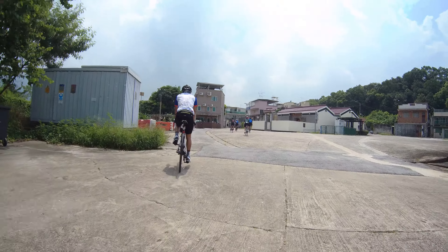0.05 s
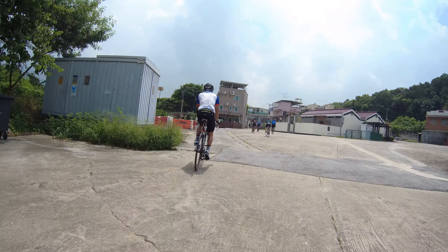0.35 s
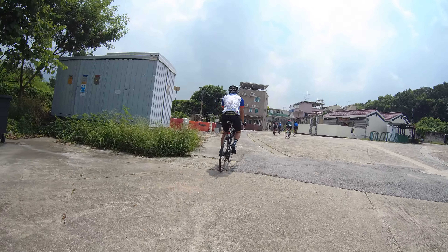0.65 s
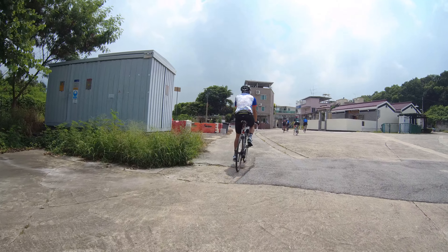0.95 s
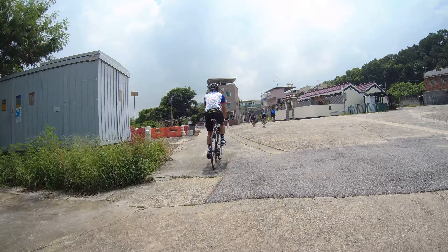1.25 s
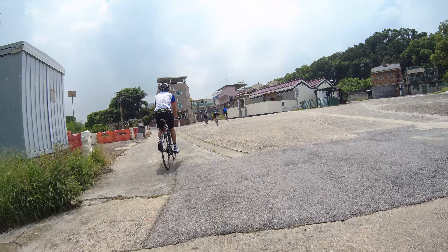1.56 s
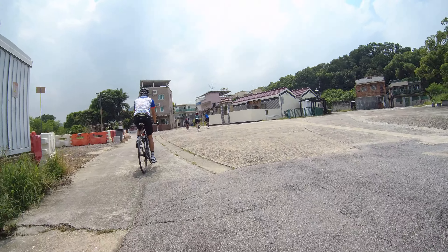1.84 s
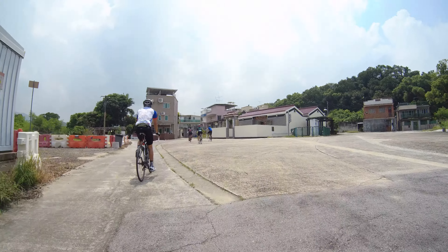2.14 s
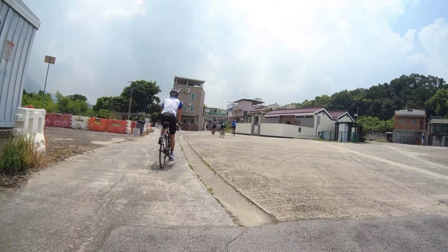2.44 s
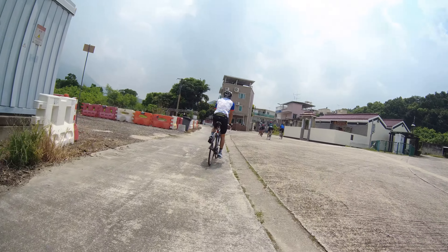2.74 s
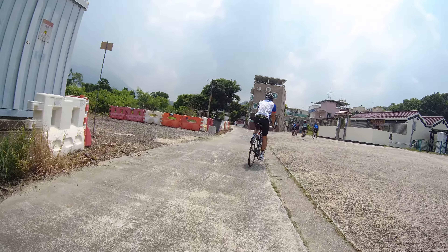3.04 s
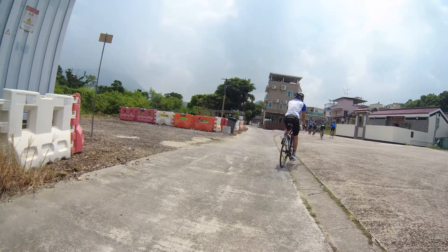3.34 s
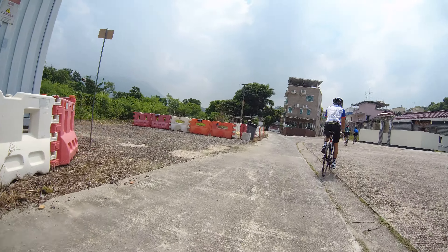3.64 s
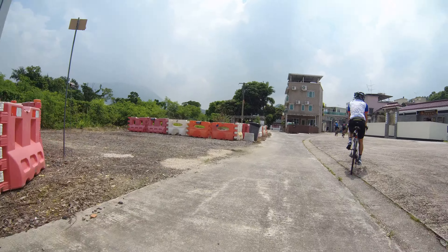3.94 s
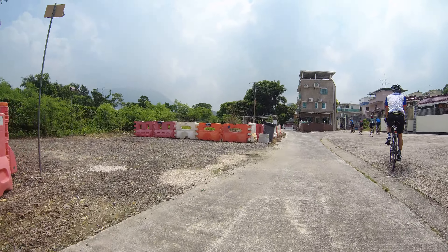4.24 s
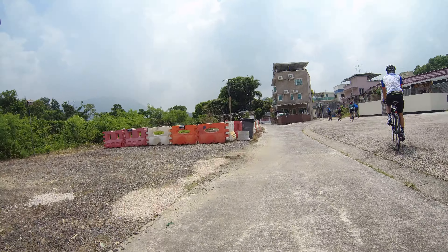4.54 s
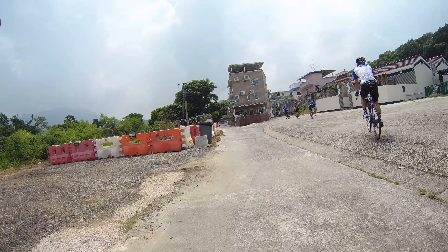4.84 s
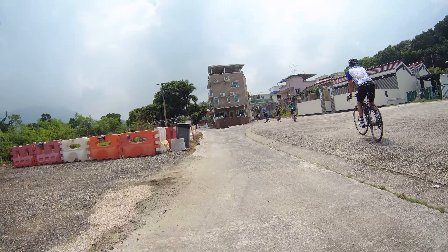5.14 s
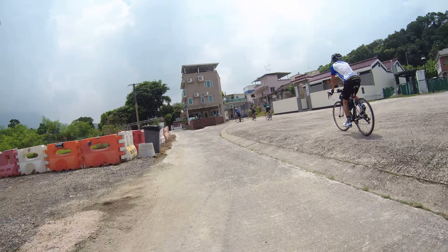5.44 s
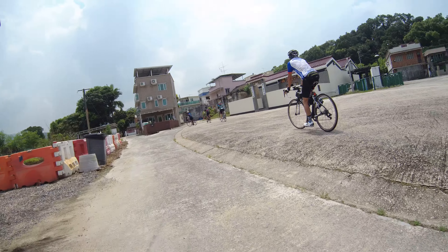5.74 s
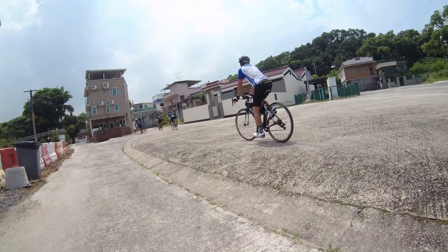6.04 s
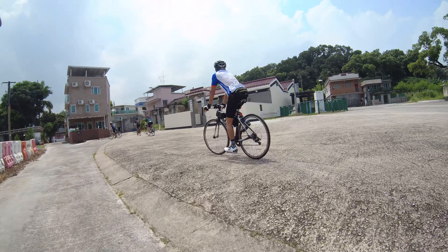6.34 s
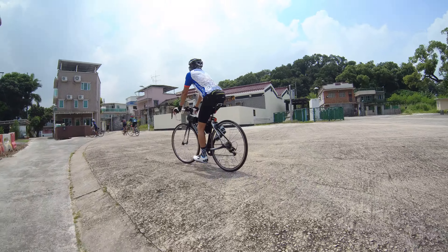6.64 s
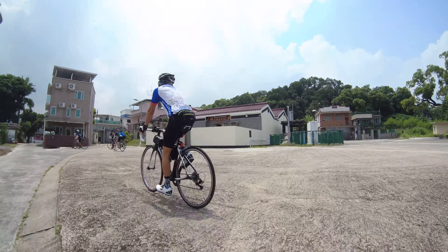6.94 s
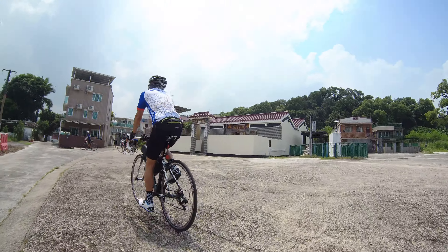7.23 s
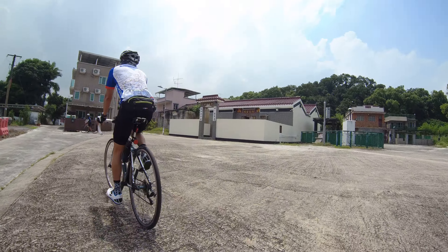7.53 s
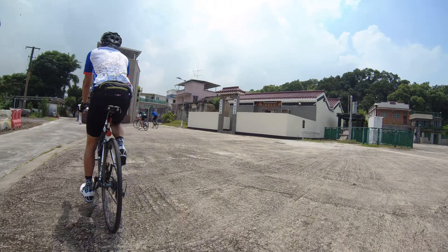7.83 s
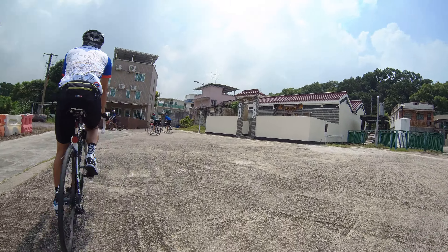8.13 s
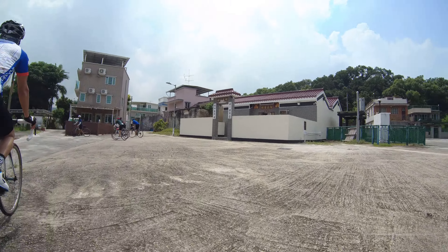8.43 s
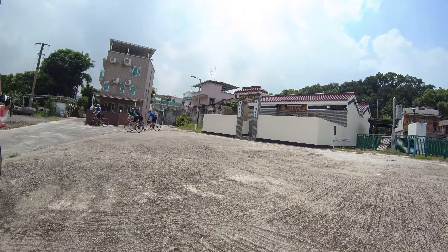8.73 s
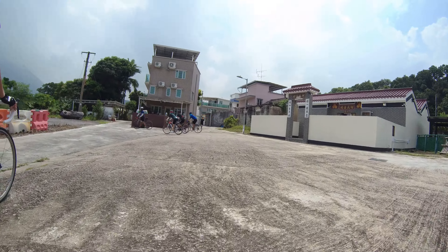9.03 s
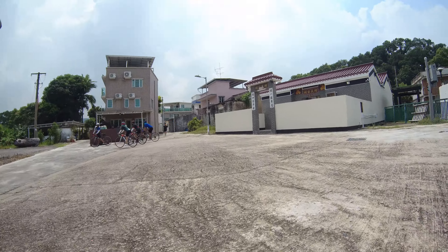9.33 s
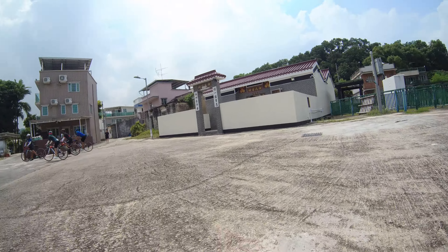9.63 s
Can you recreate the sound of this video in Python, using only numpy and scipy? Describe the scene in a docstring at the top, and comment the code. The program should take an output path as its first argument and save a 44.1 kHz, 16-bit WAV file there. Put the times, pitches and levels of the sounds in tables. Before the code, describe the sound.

A bicycle rolls over rough concrete, heard through a microphone mounted on it as a low, throbbing rumble with tyre noise and fine crackling grit. The freewheel ticks rapidly at the start, in the middle and near the end. One gear change clunks and rings briefly after the first coast. Sharp clicks, dull knocks and brief creaks come from the microphone's case and mount, growing busier in the later part.

```python
"""On a rough concrete road, a camera rides on a bicycle and hears mostly through the frame and its case.
The surface forces the frame and mount into a low rumble, while the tyres roar and grit crackles under them.
Whenever the rider coasts, the freewheel's pawls strike the ratchet and excite the modes of the hub.
Impacts set the case ringing in sharp clicks and dull knocks, the mount creaks by stick-slip friction,
and one gear change clunks and leaves the drivetrain ringing. A faint microphone hiss lies underneath."""
import sys
import numpy as np
from scipy import signal
from scipy.fft import rfft, irfft, next_fast_len
from scipy.io import wavfile

SR = 44100
rng = np.random.default_rng(int(sys.argv[2]) if len(sys.argv) > 2 else 0)


def store_wav(level_fs):
    """Save 16-bit WAV to argv[1]."""
    pcm = np.round(np.clip(np.atleast_2d(level_fs), -1, 1) * 32767)
    wavfile.write(sys.argv[1], SR, pcm.T.astype(np.int16))


N = 431298
TIME = np.arange(N) / SR

# course of the ride: t/s, rumble level/dB, tyre level/dB
RIDE_LEVELS = [(0.0, -44.5, -47), (0.11, -32, -48), (0.24, -32, -48.5), (0.68, -37.5, -55.5),
               (1.8, -34.5, -53), (1.93, -45.5, -60), (1.96, -39, -42), (2.12, -32.5, -46.5),
               (2.42, -34.5, -52), (3.18, -32, -51.5), (3.32, -31.5, -50.5), (7.14, -31.5, -46),
               (7.68, -33.5, -51.5), (8.58, -30, -43.5), (9.1, -34, -50), (9.42, -27.5, -39.5),
               (9.78, -30, -44)]
# modes of the frame and mount: f/Hz, bandwidth/Hz, level/dB
FRAME_MODES = [(32.2, 12, -3), (50.7, 6.2, 0), (77.1, 9.2, 2.5), (107, 98, 3), (166.3, 18, -1),
               (190.1, 9.7, -6), (264, 70, -20)]
# tyre roar on concrete: f/Hz, spectral level/dB
TYRE_SPECTRUM = [(150, -0.5), (260, -9), (400, -4.5), (580, -6.5), (780, -14.5), (1180, -7.5), (1600, -22),
                 (2200, -26), (3200, -42.5), (5000, -48)]
# sustained resonances of the mount: f/Hz, wander/Hz, level relative to the rumble/dB
MOUNT_TONES = [(78, 5, -9), (187, 8, -8.5)]
# grit as heard through the case: f/Hz, spectral level/dB
GRIT_SPECTRUM = [(500, 0), (1200, 12), (1600, 14), (2200, 1), (2750, -3), (3600, -13), (4500, -25),
                 (11000, -38)]
# coasting: start/s, end/s, full tooth rate/Hz, hub level/dB, tick level/dB, second pawl level/dB
COASTS = [(0, 1.87, 48, 2, 4.5, -18), (3.982, 6.5, 47, -1.5, 4, -8), (8.87, 11, 54, -1.5, 5, -9)]
# modes of hub and frame struck by the pawls: f/Hz, bandwidth/Hz, level/dB
HUB_MODES = [(956, 20, 4.5), (995, 21, 10.5), (1173, 65, 12), (1278, 61, 7.5), (1495, 72, 10.5),
             (1572, 85, 8), (1809, 44, 7)]
# thin tick of the pawls themselves: f/Hz, spectral level/dB
PAWL_SPECTRUM = [(2000, 9), (3500, 4), (3880, 11), (4200, 2), (4750, 6.5), (5400, -5), (6800, 5),
                 (8000, 0.5), (10000, 6.5), (11000, 1.5), (14000, 2), (16000, -25)]
# microphone hiss with a faint high whine: f/Hz, spectral level/dB
HISS_SPECTRUM = [(1000, -30), (4000, 3.5), (7000, 2), (12100, -1.5), (12330, 8.5), (12600, 8), (14000, -6),
                 (16000, -12)]
# modes of the case: f/Hz, bandwidth/Hz, level/dB
CASE_MODES = [(980, 380, -10), (1329, 467, 6.5), (1544, 100, -6.5), (2678, 340, 0), (3184, 230, -2),
              (3910, 316, 4.5), (4250, 490, -3), (4465, 670, -7.5), (6150, 270, -19.5), (6650, 580, -6),
              (8300, 660, -7.5), (9060, 320, -22), (10780, 4300, -18.5)]
# faint metallic after-ring of the case: f/Hz, bandwidth/Hz, level/dB
PING_MODES = [(6014, 55, -31)]
# antiresonances of the case wall: f/Hz, bandwidth/Hz
CASE_ANTIRESONANCES = [(3570, 240), (5230, 900), (7550, 500)]
# slips of the mount: t/s, level/dB, treble level/dB, duration/ms
CREAKS = [(0.085, -12.5, -50, 4.3), (3.565, -12, -21, 3.3), (3.585, -11, -6, 10.5),
          (3.6085, -8.5, -18, 5.4), (4.963, -38, -9, 16), (9.593, -18, -20, 4.7), (9.736, -17, -33, 0.58)]
# sharp rattles of the case in its mount: t/s, level/dB, midrange level/dB
RATTLES = [(0.0892, -15.5, -14), (0.1121, -22, -12), (0.138, -15.5, -14), (0.507, -9.5, -14),
           (0.5888, -19, -12), (2.0289, -11.5, -13), (2.1273, -6.5, -15.5), (2.4651, -9.5, -14.5),
           (3.1766, -5, -21.5), (3.2003, -8, -14), (3.22, -26, -16), (3.263, -21, -13), (3.5674, -10, -12),
           (6.5287, -5, -12.5), (6.7476, -9.5, -14), (6.9766, -6.5, -19), (7.0175, -13.5, -22),
           (7.0927, 2, -20), (7.1451, -17.5, -20), (7.162, -20.5, 1), (7.2195, -8, -20), (7.2616, -14, -22),
           (7.6198, -24, -19), (7.7119, -8, -2), (7.7717, -14, -16), (8.1286, -14, -17), (8.1728, -17, -20),
           (8.326, -12, -9.5), (8.3619, -12.5, -18), (8.4008, -14, -15), (8.4409, -14, -20),
           (8.52, -7.5, -19), (8.7945, -6.5, -24), (8.8652, -16, -15), (8.979, -15, -12), (9.296, 2.5, -16),
           (9.3759, -12.5, -13), (9.409, -14.5, -18), (9.528, -14, -25), (9.5677, -18, -17),
           (9.6387, -14.5, -21), (9.7488, -16.5, -10)]
# stones under the wheels: t/s, level/dB, midrange level/dB
STONES = [(0.2816, -25.5, -17), (0.7628, -34, -16), (1.439, -28.5, -13), (1.6056, -28.5, -20),
          (2.564, -30, -50), (3.0037, -37.5, -24), (3.395, -24.5, -13), (4.1081, -27, -8),
          (4.6523, -32.5, -8), (4.7973, -24, -10), (4.9004, -28, -21), (5.5957, -29.5, -23),
          (5.9499, -28, -14), (6.3585, -30, -14), (6.5917, -33, -45), (6.7549, -22.5, -28),
          (6.767, -26, -19), (6.930, -33, -19), (6.9926, -19, -11), (7.1028, -13, -20), (7.4912, -32, -13),
          (7.874, -25, -45)]
# blows of the chain dropping onto a sprocket: t/s, level/dB
CHAIN_BLOWS = [(1.9465, -13.5), (1.953, -2), (1.966, -12.5), (2.018, -16)]
# modes of the drivetrain: f/Hz, bandwidth/Hz, level/dB
DRIVETRAIN_MODES = [(371, 60, 1), (430, 120, 3), (507, 6, -2), (568, 1.7, -1.5), (582, 1.2, -1.5),
                    (724, 150, -0.5), (1152, 6, -4.5), (1314, 9.1, -14), (1425, 51, -4.5), (3700, 310, -31)]
# bumps that thump the frame: t/s, level/dB
BUMPS = [(3.676, -7.5), (6.756, -2), (9.145, -2.5)]
# patches of broken concrete: centre t/s, half duration/s, gain/dB
BROKEN_PATCHES = [(4.974, 0.05, 7.5), (6.145, 0.0064, 12), (6.609, 0.014, 10.5), (6.68, 0.038, 6)]


def undb(db):
    """Amplitude ratio of a level in decibels."""
    return 10 ** (np.asarray(db) / 20)


def unit(x):
    """Normalisation to an rms of 1."""
    return x / np.sqrt(np.mean(x ** 2))


def noise():
    """White Gaussian noise."""
    return rng.standard_normal(N)


def wander(rate_hz):
    """Random modulation of rms 1, linear between independent values."""
    knots = rng.standard_normal(2048)
    return unit(np.interp(TIME * rate_hz, np.arange(len(knots)), knots))


def colour(x, spectrum):
    """Spectral shaping by an envelope that falls 12 dB per octave beyond its ends; the rms is 1."""
    hz, db = np.transpose(spectrum)
    size = next_fast_len(N + 4096)
    f = np.maximum(np.arange(size // 2 + 1) * SR / size, 1)
    skirts = np.minimum(f / hz[0], 1) ** 2 * np.minimum(hz[-1] / f, 1) ** 2
    envelope = undb(np.interp(np.log(f), np.log(hz), db))
    return unit(irfft(rfft(x, size) * skirts * envelope, size)[:N])


def cut(x, order, hz, kind):
    """Maximally flat high-pass or low-pass filtering."""
    return signal.sosfilt(signal.butter(order, hz, kind, fs=SR, output="sos"), x)


def ring(modes, size, rise_ms, low_hz, travel_ms=0):
    """Impulse response as a sum of damped modes, weighted by energy; the bass radiates poorly."""
    hz, width, db = np.transpose(modes)[:, :, None]
    # bending waves: low modes arrive later and build up more slowly (both times given at 1 kHz)
    t = np.maximum(np.arange(size) / SR - travel_ms / hz, 0)
    waves = np.sin(2 * np.pi * hz * t) * np.exp(-np.pi * width * t) * (1 - np.exp(-t * hz / rise_ms))
    waves /= np.sqrt(np.sum(waves ** 2, axis=1, keepdims=True))
    return cut(np.sum(undb(db) * waves, axis=0), 2, low_hz, "high")


def place(events):
    """Superposition of transients, each given as t/s, level/dB, waveform."""
    out = np.zeros(N)
    for s, db, sound in events:
        i = int(s * SR)
        out[i:i + len(sound)] += undb(db) * sound[:max(N - i, 0)]
    return out


def road_rumble(rumble_db, roughness, swell_db=2.3):
    """Forced vibration: the rough surface drives the modes of the frame with a random force."""
    force = noise() * undb(rumble_db + swell_db * roughness)
    frame = ring(FRAME_MODES, size=16384, rise_ms=0.021, low_hz=24.7)
    shake = signal.fftconvolve(force, frame)[:N]
    return cut(shake, 6, 26, "high") * undb(-9.5)


def tyre_roar(tyre_db, roughness, swell_db=1.6, flicker_db=4):
    """Rolling noise: a broad band whose amplitude is modulated by the roughness of the road."""
    return colour(noise(), TYRE_SPECTRUM) * undb(tyre_db + swell_db * roughness + flicker_db * wander(170))


def mount_throb(rumble_db):
    """Resonance: the camera keeps swinging on its mount, pulsing and wandering in pitch."""
    out = np.zeros(N)
    for hz, wander_hz, db in MOUNT_TONES:
        pulse_db = 3 * wander(20)
        phase = 2 * np.pi * np.cumsum(hz + wander_hz * wander(20)) / SR
        out += np.sin(phase) * undb(rumble_db + db + pulse_db)
    return out


def grit(tyre_db, hits_per_s=130, spread_db=6):
    """Shot noise: small stones crack under the tyres at random and merge into a fine, dull crackle."""
    sizes = undb(spread_db * np.minimum(rng.exponential(size=N), 2.4))
    hits = (rng.random(N) < hits_per_s / SR) * sizes * np.sign(noise())
    return colour(hits, GRIT_SPECTRUM) * undb(tyre_db - 9.5)


def coasting_curves(stop_s=.25, restart_s=.22, hub_fade_db_per_s=0.34, tick_fade_db_per_s=1):
    """Relative motion: the tooth rate drops while the pedals turn; the levels fade through a coast."""
    rate, hub_db, tick_db, second_db = np.zeros((4, N))
    for start, end, full_rate, hub, tick, second in COASTS:
        now = TIME >= start
        since, left = TIME[now] - start, np.maximum(end - TIME[now], 0)
        pedal_share = .2 * np.exp(-since / stop_s) + .33 * np.exp(-left / restart_s)
        rate[now] = full_rate * (1 - pedal_share)
        hub_db[now] = hub - hub_fade_db_per_s * since
        tick_db[now] = tick - tick_fade_db_per_s * since
        second_db[now] = second
    return rate, hub_db, tick_db, second_db


def freewheel(wobble=.016, jitter_teeth=0.018, lag_teeth=0.3, tick_teeth=.14, scrape_db=-14):
    """Periodic impact: pawls drop off the ratchet teeth and ring the hub, a weaker one in between."""
    rate, hub_db, tick_db, second_db = coasting_curves()
    coasting = sum((TIME >= start) & (TIME < end) for start, end, *_ in COASTS)
    teeth = np.cumsum(rate * (1 + wobble * wander(7))) / SR + jitter_teeth * wander(40)
    surge_db = 1.93 * wander(6)  # the pawls bite unevenly as the wheel turns
    drops, ticks = np.zeros((2, N))
    for lag, db in ((0, 0), (lag_teeth, second_db)):
        phase = (teeth - lag) % 1
        strength = undb(db + surge_db + 3 * wander(58))
        drops += (np.diff(phase, prepend=0) < -.5) * strength
        ticks += strength * np.exp(-(np.minimum(phase, 1 - phase) / tick_teeth) ** 2)
    # each drop is a blow within a short scrape along the tooth
    force = (unit(drops) + undb(scrape_db) * unit(ticks * noise())) * coasting
    hub = np.zeros(N)
    for modes in (HUB_MODES[::2], HUB_MODES[1::2]):  # neighbouring modes swell and fade independently
        response = ring(modes, size=4096, rise_ms=0.73, low_hz=850)
        hub += signal.oaconvolve(force, response)[:N] * undb(2.5 * wander(7))
    hub = cut(hub, 8, 2000, "low")  # the frame passes little treble
    thin_tick = colour(noise(), PAWL_SPECTRUM) * ticks * coasting
    return unit(hub) * undb(hub_db - 51.5) + thin_tick * undb(tick_db - 66.5)


def microphone_hiss():
    """Self-noise: a steady microphone hiss, with a faint whine from the camera's electronics as one narrow
    spectral peak."""
    return colour(noise(), HISS_SPECTRUM) * undb(-78)


def case_knock(mid_db, treble_db, detune=.008, scatter_db=2.24, rebound_ms=.66, rebound=0.098):
    """Impact with a quick rebound: the harder the contact, the more it excites the upper case modes."""
    hz, width, db = np.transpose(CASE_MODES + PING_MODES)
    drift, scatter = rng.standard_normal((2, len(hz)))
    hz = hz * (1 + detune * drift)
    hardness_db = np.interp(hz, [1700, 3000, 6200], [0, mid_db, treble_db])
    modes = np.transpose([hz, width, db + hardness_db + scatter_db * scatter])
    blow = ring(modes, size=2048, rise_ms=0.65, low_hz=640, travel_ms=0.72)
    for dip_hz, dip_width in CASE_ANTIRESONANCES:
        blow = signal.lfilter(*signal.iirnotch(dip_hz, dip_hz / dip_width, fs=SR), blow)
    lag = int(rebound_ms * rng.uniform(.85, 1.1) * SR / 1000)
    return blow + rebound * np.pad(blow, (lag, 0))[:len(blow)]


def frame_thuds(blows):
    """Free vibration: each blow (t/s, level/dB) leaves the low modes of the frame to decay."""
    frame = ring(FRAME_MODES, size=16384, rise_ms=0.035, low_hz=132)
    return place((s, db, frame) for s, db, *_ in blows)


def jolt(events, thud_db=-16):
    """Mechanical coupling: each sound of the case, scaled by energy, comes with a thud in the frame."""
    case = place((s, db, sound / (np.linalg.norm(sound) + 1e-12)) for s, db, sound in events)
    return case + undb(thud_db) * frame_thuds(events)


def mount_creaks(slip_chance=0.12, lurch_db=-8):
    """Stick-slip friction: the mount gives way in a run of tiny blows, and the whole camera lurches."""
    events = []
    for s, db, treble_db, ms in CREAKS:
        slips = rng.standard_normal(2048) * (rng.random(2048) < slip_chance)
        creak = signal.fftconvolve(slips[:int(ms * SR / 1000)], case_knock(treble_db / 5, treble_db))
        events.append((s, db, creak))
    return (jolt(events) + undb(lurch_db) * frame_thuds(CREAKS)) * undb(15)


def case_rattles(heavy_db=-13, treble_loss_db_per_db=0.76):
    """Contact time limits bandwidth: light rattles snap, heavy ones press longer and sound duller."""
    events = []
    for s, db, mid_db in RATTLES:
        treble_db = 1 - treble_loss_db_per_db * max(db - heavy_db, 0)
        events.append((s, db, case_knock(mid_db + 11, treble_db)))
    return jolt(events) * undb(11)


def stone_knocks():
    """Structure-borne sound: stones under the wheels reach the case as knocks with little treble."""
    events = [(s, db, case_knock(mid_db + 9.5, treble_db=-56)) for s, db, mid_db in STONES]
    return jolt(events) * undb(12)


def gear_change(waver_s=.00018, waver_db=3.7, onset_s=.15):
    """Modal decay: the chain lands on a sprocket in a few blows, and lightly damped modes ring on."""
    clunk = ring(DRIVETRAIN_MODES, size=44100, rise_ms=0.49, low_hz=223)
    ringing = place((s, db, clunk) for s, db in CHAIN_BLOWS)
    ringing = np.interp(TIME + waver_s * wander(35), TIME, ringing)  # the pitch wavers
    depth = np.clip((TIME - CHAIN_BLOWS[0][0]) / onset_s, 0, 1)
    return ringing * undb(waver_db * depth * wander(45))


def broken_concrete_db():
    """Rolling noise grows with roughness: its gain as the tyres scrape over each broken patch."""
    return sum(db * np.exp(-((TIME - s) / half_s) ** 4) for s, half_s, db in BROKEN_PATCHES)


def scene():
    """Superposition: all sources add in one channel, and one road roughness swells rumble and roar."""
    times, rumble_levels, tyre_levels = np.transpose(RIDE_LEVELS)
    rumble_db = np.interp(TIME, times, rumble_levels)
    tyre_db = np.interp(TIME, times, tyre_levels) + broken_concrete_db()
    hiss = microphone_hiss()
    roughness = wander(22)
    road = road_rumble(rumble_db, roughness) + tyre_roar(tyre_db, roughness)
    running = road + mount_throb(rumble_db) + grit(tyre_db) + freewheel()
    impacts = case_rattles() + stone_knocks() + mount_creaks() + gear_change() + frame_thuds(BUMPS)
    return (running + impacts + hiss)[None]


def record(dry):
    """Soft saturation and band limiting: the camera rounds the loudest peaks and cuts the top."""
    ceiling, top_hz = 1.5, 15900
    rounded = ceiling * np.tanh(dry / ceiling)
    return signal.sosfilt(signal.ellip(8, .2, 80, top_hz, fs=SR, output="sos"), rounded)


dry = scene()
out = record(dry)
store_wav(out)
```